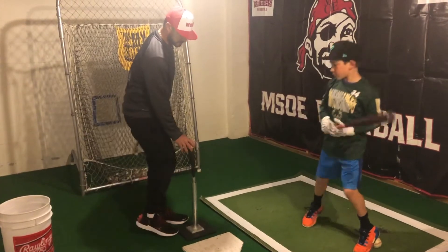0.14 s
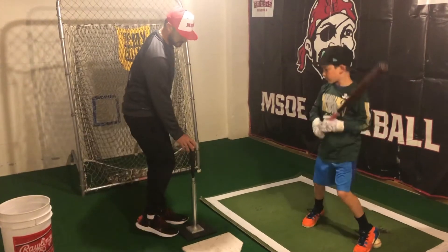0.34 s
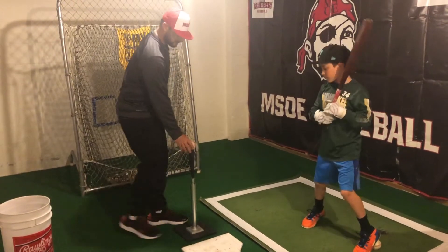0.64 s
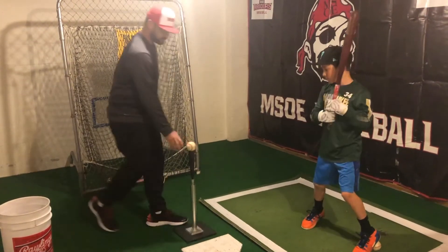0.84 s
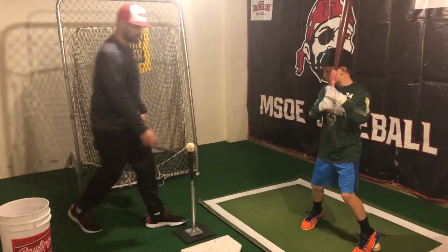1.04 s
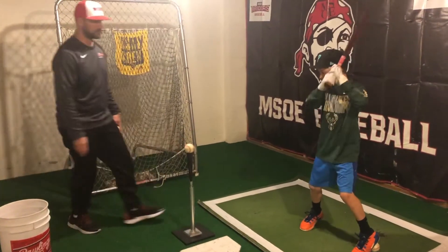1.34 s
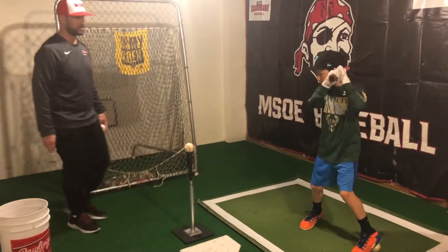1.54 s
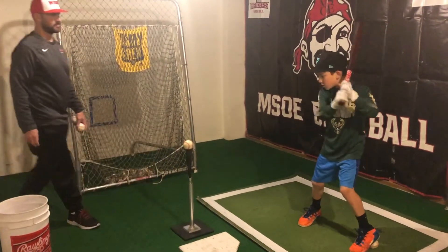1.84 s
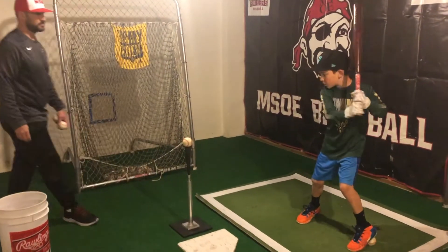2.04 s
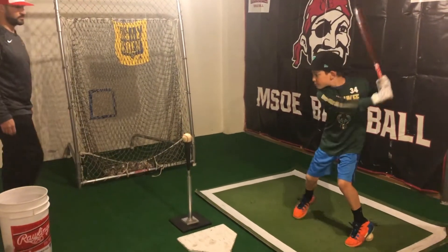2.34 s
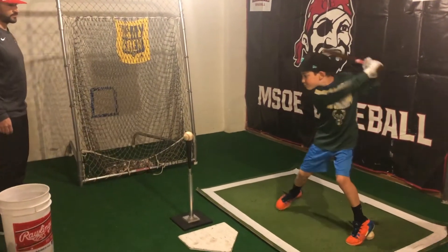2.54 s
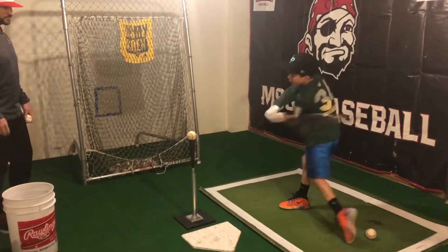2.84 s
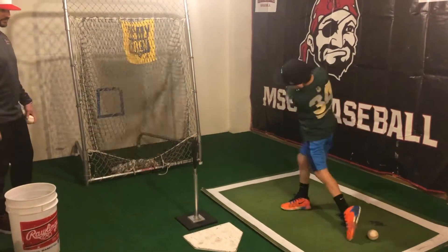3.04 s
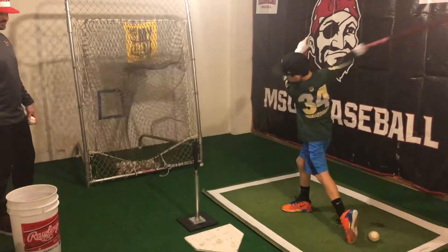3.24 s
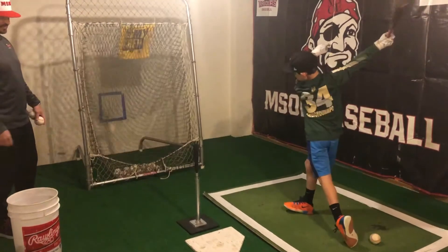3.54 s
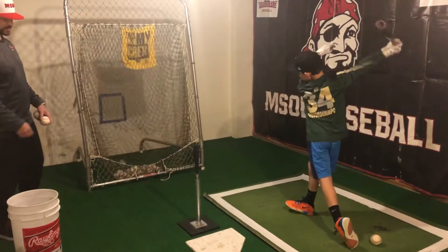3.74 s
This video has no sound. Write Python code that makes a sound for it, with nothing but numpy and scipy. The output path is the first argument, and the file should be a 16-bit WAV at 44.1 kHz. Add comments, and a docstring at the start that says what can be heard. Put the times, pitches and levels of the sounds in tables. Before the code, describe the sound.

One loud crack of a bat on a ball rings through a hard-walled room, following a plastic rattle at the tee and soft footsteps. The ball slaps into netting, the metal frame rings, and a low thud follows.

```python
"""A thud and a plastic rattle as a ball is pushed onto a tee in an indoor batting cage. Shoes scuff and
balls knock on the turf; then a metal bat swishes through the air and cracks the ball into the net.
The net slaps and rustles, and its steel tube frame clangs and rings, damped by the swinging net.
A last heavy thud hits the floor. The hard-walled room answers every blow over a low hush."""
import sys
import numpy as np
from scipy import signal
from scipy.fft import rfft, irfft, next_fast_len
from scipy.io import wavfile
from scipy.ndimage import uniform_filter1d, map_coordinates

SR = 44100
rng = np.random.default_rng(int(sys.argv[2]) if len(sys.argv) > 2 else 0)


def wav_record(signal):
    """Record a signal, one row per channel, as 16-bit PCM in the file named by sys.argv[1]."""
    frames = np.transpose(np.atleast_2d(signal))
    bounded = np.clip(frames, -1, 1)
    # unit amplitude maps onto the largest positive 16-bit level
    quanta = np.round(bounded * 32767).astype(np.int16)
    wavfile.write(sys.argv[1], SR, quanta)


N = 171990
TIME_S = np.arange(N) / SR

# Bat meets ball: start_s, energy_db
BAT_HITS = [(2.9308, 24)]
# Colour of the crack: freq_hz, level_db
BAT_COLOUR = [(35, -76), (60, -29), (184, -14.5), (268, -14.5), (448, -4.5), (566, -0.5), (749, 0.5),
              (1410, -3.5), (1660, -6.5), (2190, -2.5), (2710, -10), (16000, -36)]
def bat_crack():
    """Metal strikes the ball: a very short contact, thin up close, that fills the room."""
    return blows(BAT_HITS, BAT_COLOUR, contact_s=0.00041, wet_db=10, thin_hz=900)


# Ball and tee hit the netting: start_s, energy_db
NET_HITS = [(2.944, 8), (3.012, 7.5)]
# Colour of the slap: freq_hz, level_db
NET_COLOUR = [(300, -55), (1500, 4), (4000, 7.5), (7000, -1), (16000, 0.5)]
def net_slaps():
    """The net catches ball and tee with longer, brighter contacts."""
    return blows(NET_HITS, NET_COLOUR, contact_s=0.0046, wet_db=2)


# Knocks on the frame: start_s, ring_db, clack_energy_db, net_damping_db_per_s
FRAME_HITS = [(3.071, -24, -16, 200), (3.110, -25.5, 2.5, 65), (3.123, -16.5, -1, 167),
              (3.226, -33, -34, 93), (3.357, -42.5, -32, 72), (3.446, -56, -32, 70), (3.571, -37, -7.5, 54),
              (3.577, -31, -10.5, 7.5)]
# Modes of the steel tube: pitch_hz, level_db, t60_s
TUBE_MODES = [(1105, -13, 0.2), (1960, -11.5, 0.22), (3866, -1, 1.22), (3905, -2, 0.46), (3995, -2, 0.23),
              (5070, -21, 0.13), (5660, -18, 0.25), (6520, -10, 0.15), (7240, -11, 0.15), (8270, -14, 0.17),
              (10920, -3, 0.16), (11090, -9, 0.2)]
# Colour of the clack: freq_hz, level_db
CLACK_COLOUR = [(500, -44), (1100, 5), (3000, 5.5), (7000, 4.5), (16000, -3.5)]
def frame_clangs():
    """Each knock clacks and rings the tube; the swinging net damps the ring and makes it stutter."""
    hard_db, dulling_per_octave = -10, 0.45  # clacks softer than hard_db ring duller above 4 kHz
    stutter_db, stutters_per_s, full_damping_db_per_s = 9, 40, 150
    clacks = [(start_s, clack_db) for start_s, _, clack_db, _ in FRAME_HITS]
    out = blows(clacks, CLACK_COLOUR, contact_s=0.0036, wet_db=-3)
    for start_s, ring_db, clack_db, damping in FRAME_HITS:
        tilt_db = dulling_per_octave * min(clack_db - hard_db, 0)
        modes = [(hz, db + tilt_db * max(np.log2(hz / 4000), 0), t60) for hz, db, t60 in TUBE_MODES]
        dips = np.abs(map_coordinates(rng.standard_normal(SR), [np.arange(SR) * stutters_per_s / SR]))
        stutter = amp(-stutter_db * np.clip(damping / full_damping_db_per_s, 0, 1) * dips)
        tube = ring(modes, attack_s=0.0016, jangle=5, damping_db_per_s=damping)  # loose joints jangle
        echoes = room(np.ones(1), wet_db=-12)
        add(out, start_s, amp(ring_db) * signal.fftconvolve(stutter * tube, echoes))
    return out


# Thuds on the floor, and at 3.029 s the ball driving into the net: start_s, knock_energy_db, boom_db, thump_db
THUD_HITS = [(.105, -8, -48, -41), (.120, -11, -48.5, -36), (.987, -9, -34, -30),
             (1.575, -24.5, -60.5, -62), (1.785, -26, -66, -57), (2.596, -21.5, -64, -43),
             (3.029, -14, -40.5, -55), (3.346, -18.5, -48, -46), (3.721, 0, -39.5, -26)]
# Colour of the knock: freq_hz, level_db
TURF_COLOUR = [(24, -18), (40, -47), (97, -9), (139, -8), (281, -6), (397, -9.5), (878, -27.5), (2210, -33),
               (3900, -38), (6600, -120)]
# Low modes of floor and room: pitch_hz, level_db, t60_s
BOOM_MODES = [(68.2, -9.5, 0.99), (102.6, -4.5, 1), (126.6, 6.5, 0.6), (158.3, -1.5, 0.54)]
def thuds():
    """Balls land on turf, and the ball drives into the net: a soft knock, a thump that sinks about an octave,
    then a low boom."""
    rest_hz, glide_s, t60_s, attack_s = 151.3, 0.0195, 0.13, 0.0042
    t = np.arange(SR // 2) / SR
    pitch_hz = rest_hz * (1 + 1.016 * np.exp(-t / glide_s))
    envelope = amp(-60 * t / t60_s) * (1 - np.exp(-t / attack_s))
    thump = envelope * np.sin(2 * np.pi * np.cumsum(pitch_hz) / SR)
    out = blows([row[:2] for row in THUD_HITS], TURF_COLOUR, contact_s=0.00015, wet_db=14)
    for start_s, _, boom_db, thump_db in THUD_HITS:
        add(out, start_s, amp(boom_db) * ring(BOOM_MODES, attack_s=0.013, jangle=10.8))
        add(out, start_s, amp(thump_db) * thump)
    return out


# Ball pushed onto the tee, and other small knocks: start_s, energy_db
TEE_HITS = [(.107, -10.5), (.123, -8.5), (.166, -6), (.987, -43), (1.978, -48)]
# Colour of the plastic: freq_hz, level_db
TEE_COLOUR = [(200, -31), (280, -6), (1100, -3), (1750, -14), (2200, -10.5), (2800, -20.5), (3500, -14),
              (4400, -16.5), (6000, -14.5), (7000, -23.5), (16000, -21.5)]
def tee_rattles():
    """The ball rattles onto the plastic tee; two faint ticks follow."""
    return blows(TEE_HITS, TEE_COLOUR, contact_s=0.0032, wet_db=4)


# Swell of the swing: time_s, level_db
SWING_LEVEL = [(2.7, -65), (2.752, -52.5), (2.776, -51), (2.836, -57), (2.915, -44.5)]
# Colour of the rushing air: freq_hz, level_db
AIR_COLOUR = [(24, -44), (40, 2), (74, 6.5), (151, -1.5), (288, 1.5), (535, -4.5), (1420, -5.5),
              (9000, -25.5), (17600, -120)]
def bat_swish():
    """Bat and sleeves rush through the air, cutting off just after the crack."""
    start_s, end_s = SWING_LEVEL[0][0], BAT_HITS[0][0] + 0.06
    gate = np.clip((TIME_S - start_s) / 0.041, 0, 1) * np.clip((end_s - TIME_S) / 0.02, 0, 1)
    return gate * fader(SWING_LEVEL) * patchy_noise(AIR_COLOUR)


# Foot moves: start_s, rise_s, fall_s, level_db
SHOE_MOVES = [(.0, 0.0018, 0.03, -66), (0.637, 0.048, 0.065, -56), (0.988, 0.0091, 0.27, -59),
              (1.773, 0.0084, 0.12, -54), (1.9, 0.085, 0.063, -58.5), (2.02, 0.045, 0.066, -55.5),
              (2.24, 0.051, 0.043, -61), (2.485, 0.01, 0.052, -55), (2.6, 0.023, 0.36, -60.5),
              (3.68, 0.046, 0.037, -50)]
# Colour of sole on turf: freq_hz, level_db
SOLE_COLOUR = [(120, -28), (200, 10.5), (482, -4), (968, 4), (1100, 8.5), (1350, 2), (15100, -3),
               (16000, -19)]
def shoe_scuffs():
    """Soles brush the turf: a hiss that rises, then fades."""
    envelope = np.zeros(N)
    for start_s, rise_s, fall_s, level_db in SHOE_MOVES:
        swell = np.clip((TIME_S - start_s) / rise_s, 0, 1) ** 2
        fade = np.exp(-np.clip((TIME_S - start_s - rise_s) / fall_s, 0, None) ** 1.18)
        envelope += amp(level_db) * swell * fade
    return envelope * patchy_noise(SOLE_COLOUR)


# Fade of the rustle: time_s, level_db
RUSTLE_LEVEL = [(3.3, -52.5), (3.9, -61.5)]
# Colour of the net cord: freq_hz, level_db
CORD_COLOUR = [(500, 0), (1700, -2), (2200, -9), (3500, -8.5), (16000, -19)]
def net_rustle():
    """The netting rustles on its frame from the crack onward."""
    return (TIME_S > BAT_HITS[0][0]) * fader(RUSTLE_LEVEL) * patchy_noise(CORD_COLOUR)


# Faint narrow rasps: start_s, length_s, pitch_hz, level_db
RASPS = [(3.43, 0.1, 1608, -57.5), (3.636, 0.23, 2820, -52)]
def rasps():
    """Dense clicks through one resonance swell and fade, perhaps cord on tube."""
    out = np.zeros(N)
    for start_s, length_s, pitch_hz, level_db in RASPS:
        clicks = rng.standard_normal(N) * (rng.random(N) < 0.01)
        rasp = signal.lfilter(*signal.iirpeak(pitch_hz, Q=15, fs=SR), clicks)
        progress = np.clip((TIME_S - start_s) / length_s, 0, 1)
        out += amp(level_db) * np.sin(np.pi * progress ** 0.5) * unit_rms(rasp)
    return out


# Drift of the hush: time_s, level_db
HUSH_LEVEL = [(0.0, -63), (0.77, -64), (1.01, -65.5), (1.16, -55.5), (1.37, -59.5), (2.4, -60),
              (2.61, -57.5), (2.7, -64)]
# Colour of the hush: freq_hz, level_db
HUSH_COLOUR = [(18, -60), (30, 24), (109, -5.5), (345, -7.5), (600, -12), (1670, -15), (2010, -17.5),
               (3400, -20), (16000, -28.5)]
def room_tone():
    """A low, gently shifting hush lies under everything."""
    return fader(HUSH_LEVEL) * patchy_noise(HUSH_COLOUR, patchy_db=2)


# Decay of the reverb: freq_hz, t60_s
ROOM_DECAY = [(60, 0.87), (125, 0.65), (250, 0.51), (700, 0.59), (2000, 0.48), (5000, 0.37), (16000, 0.22)]
# Time the echoes take to thicken: freq_hz, build_s
ROOM_BUILD = [(100, 0.0043), (700, 0.014), (3000, 0.0041), (16000, 0.007)]
# First echoes off the walls, as loud as at wet_db = 10: delay_s, level_db
WALL_ECHOES = [(.0035, -7), (.006, -8), (.014, -8), (.021, -6), (.037, -9)]
def room(contact, wet_db):
    """The contact, its echoes off hard walls, and a fresh diffuse tail that builds and dies by band."""
    hz, t, bands = signal.stft(rng.standard_normal(SR), SR, nperseg=256)
    decay = amp(-60 * t / at_hz(ROOM_DECAY, hz)[:, None])
    build = 1 - np.exp(-t / at_hz(ROOM_BUILD, hz)[:, None])
    tail = signal.istft(bands * decay * build, SR, nperseg=256)[1]
    out = amp(wet_db) * unit_energy(tail)
    add(out, 0, contact)
    for delay_s, level_db in WALL_ECHOES:
        arrival_s = delay_s * rng.uniform(0.92, 1.05)
        add(out, arrival_s, amp(level_db + wet_db - 10) * rng.choice([-1, 1]) * contact)
    return out


def blows(hits, colour, contact_s, wet_db, thin_hz=0):
    """Short rough contacts, coloured and heard in the room; thin_hz cuts bass from all but the tail."""
    out, t = np.zeros(N), np.arange(SR // 10) / SR
    pulse = click(colour)
    for start_s, energy_db in hits:
        contact = unit_energy(rng.standard_normal(len(t)) * t * np.exp(-t / contact_s))
        thinned = signal.lfilter([1, -1], [1, -np.exp(-2 * np.pi * thin_hz / SR)], contact)
        heard = signal.fftconvolve(pulse, room(thinned, wet_db))
        add(out, start_s, amp(energy_db) * unit_energy(heard))
    return out


def ring(modes, attack_s, jangle, damping_db_per_s=0):
    """Damped modes, a little different at every blow; jangle blurs the short-lived ones most."""
    tones, t = np.zeros(SR), np.arange(SR) / SR
    for pitch_hz, level_db, t60_s in modes:
        envelope = amp(level_db + rng.normal(0, 0.97) - (60 / t60_s + damping_db_per_s) * t)
        phase_drift = np.cumsum(rng.standard_normal(SR)) * np.sqrt(jangle / SR) / t60_s
        tones += envelope * np.sin(2 * np.pi * pitch_hz * t + phase_drift)
    return tones * (1 - np.exp(-t / attack_s))


def click(colour, size=8192):
    """The tightest causal pulse with this colour, energy 1."""
    cepstrum = irfft(np.log(amp(at_hz(colour, np.fft.rfftfreq(size, 1 / SR)))))
    cepstrum[1:size // 2] *= 2  # fold to minimum phase
    cepstrum[size // 2 + 1:] = 0
    return unit_energy(irfft(np.exp(rfft(cepstrum)))[:size // 2])


def patchy_noise(colour, patchy_db=1.5):
    """Coloured noise of rms 1 whose gain wanders in patches of frequency and time."""
    hz, _, bands = signal.stft(rng.standard_normal(N), SR, nperseg=512)
    patches = uniform_filter1d(rng.standard_normal(bands.shape), size=6, axis=0)
    patches = uniform_filter1d(patches, size=10, axis=1)
    gain = amp(at_hz(colour, hz)[:, None] + patchy_db * unit_rms(patches))
    return unit_rms(signal.istft(bands * gain, SR, nperseg=512)[1][:N])


def fader(points):
    """Gain per sample through (time_s, level_db) points."""
    return amp(np.interp(TIME_S, *np.transpose(points)))


def at_hz(points, hz):
    """Reads (freq_hz, value) points along a log frequency axis."""
    freq_hz, values = np.transpose(points)
    return np.interp(np.log(hz + 1), np.log(freq_hz + 1), values)


def amp(db):
    return 10 ** (np.asarray(db) / 20)


def unit_rms(x):
    return x / np.sqrt(np.mean(x ** 2) + 1e-20)


def unit_energy(x):
    return x / np.linalg.norm(x)


def add(out, start_s, x):
    """Mixes x into out at start_s."""
    part = out[round(start_s * SR):][:len(x)]
    part += x[:len(part)]


def scene():
    """All sources in one mono mix."""
    impacts = bat_crack() + net_slaps() + tee_rattles() + thuds() + frame_clangs()
    textures = net_rustle() + rasps() + shoe_scuffs() + bat_swish() + room_tone()
    return (impacts + textures)[None]


def record(dry):
    """Soft clipping at full scale, the microphone's low cut, then the band limit."""
    low_cut_hz, top_hz = 55, 15900
    clipped = dry / (1 + np.abs(dry) ** 6) ** (1 / 6)
    size = next_fast_len(N + 8192)
    hz = np.fft.rfftfreq(size, 1 / SR)
    low_cut = (1j * hz / (low_cut_hz + 1j * hz)) ** 2
    return irfft(rfft(clipped, size) * low_cut * (hz < top_hz), size)[..., :N]


dry = scene()
out = record(dry)
wav_record(out)
```